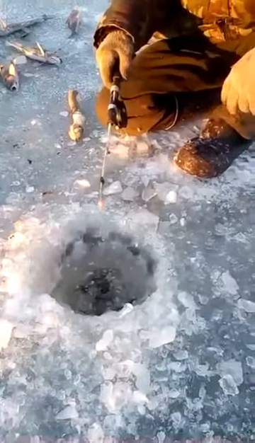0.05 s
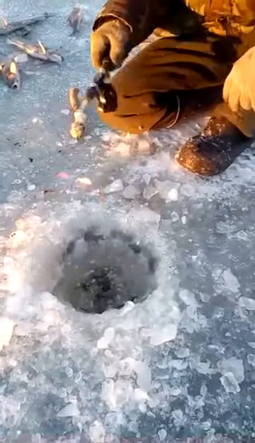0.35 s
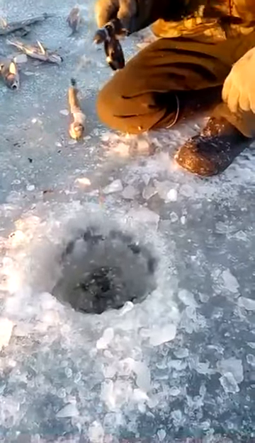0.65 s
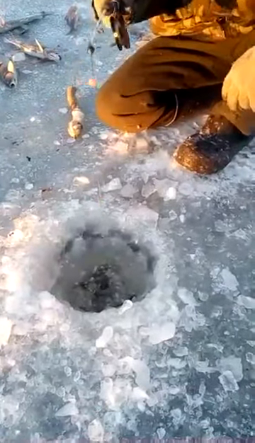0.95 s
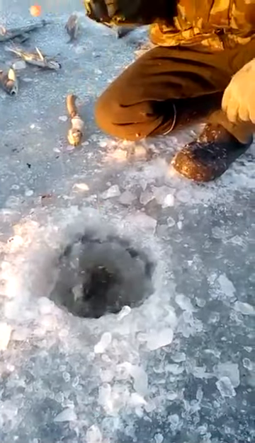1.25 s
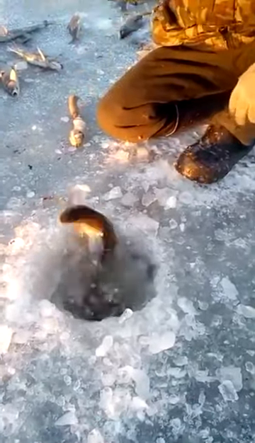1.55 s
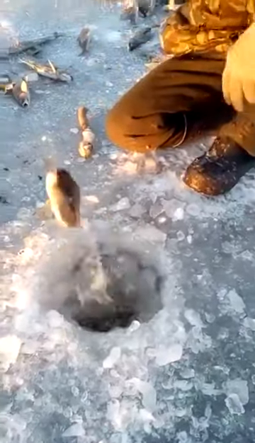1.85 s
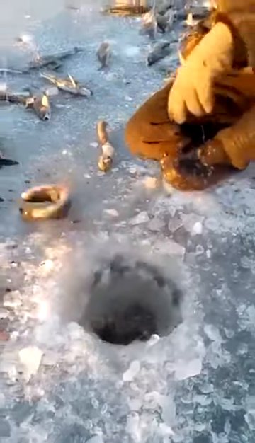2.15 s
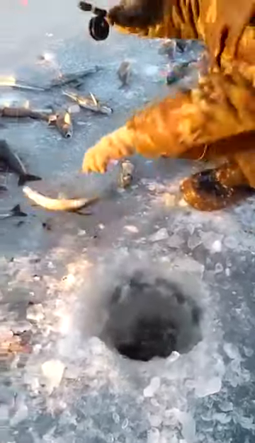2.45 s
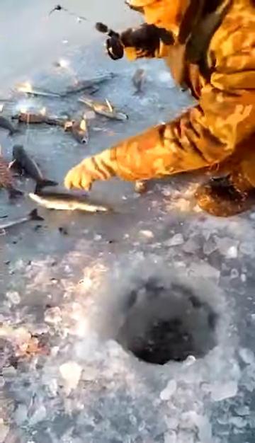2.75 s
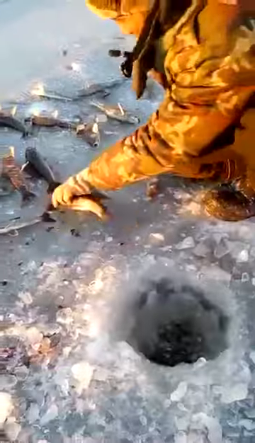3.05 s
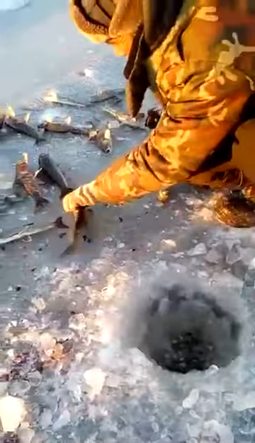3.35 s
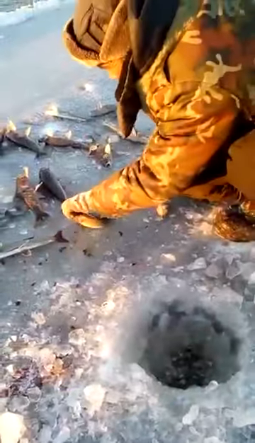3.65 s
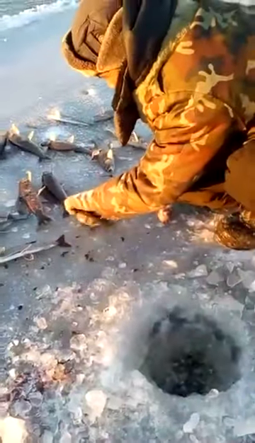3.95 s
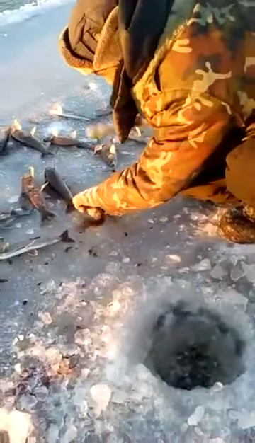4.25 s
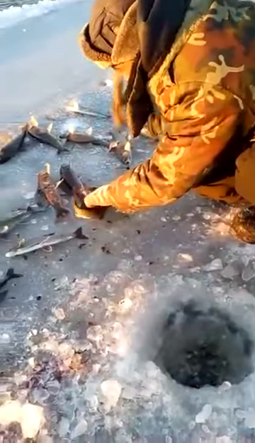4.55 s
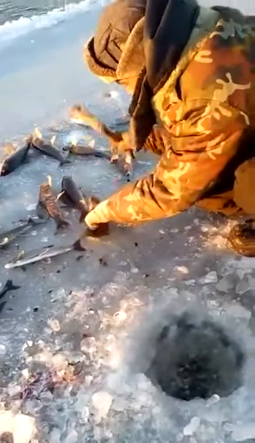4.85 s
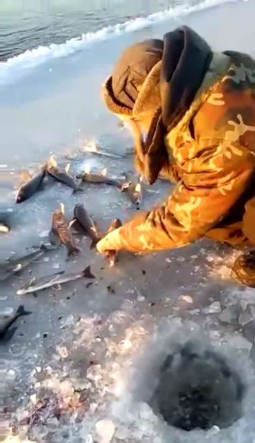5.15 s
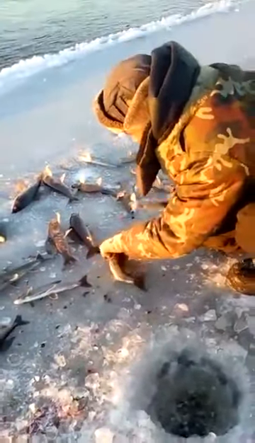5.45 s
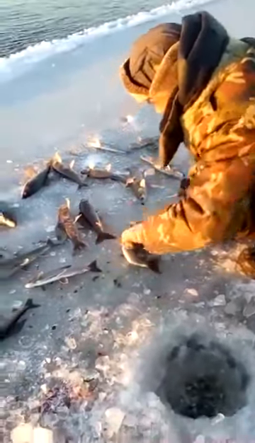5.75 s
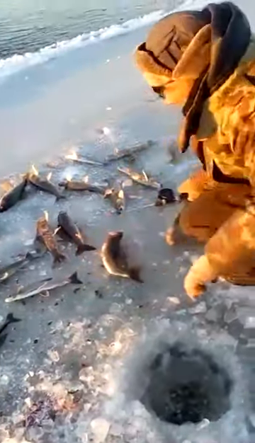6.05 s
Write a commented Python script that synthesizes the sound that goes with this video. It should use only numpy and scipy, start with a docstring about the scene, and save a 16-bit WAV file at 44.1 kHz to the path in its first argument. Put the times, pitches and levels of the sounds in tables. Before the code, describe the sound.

A fishing line hisses and water gurgles as a fish is pulled out, then it flops and slaps on wet ice amid jacket rustles.

```python
"""At a hole in the ice, in the open air, a fish is pulled out and held down on wet slush.
The line hisses by friction and the reel clacks in the modes of its housing. Bubbles, each a small
resonator, fizz and gulp in the hole. The fish skids. The flopping fish, a knee, the rod and a stick
striking the fish each push the air (a thud) and tear a film of water (a wet slap). Wet skin and ice
crumbs snap under a glove, and a stiff winter jacket rustles as the arm moves."""
import sys
import numpy as np
from scipy import signal
from scipy.fft import rfft, irfft
from scipy.io import wavfile

SR = 44100
rng = np.random.default_rng(int(sys.argv[2]) if len(sys.argv) > 2 else 0)


def inscribe(sig):
    """Save sig as 16-bit PCM at rate SR to the path in sys.argv[1].

    A 1-D sig is mono; a 2-D sig holds one channel per row.
    Samples are clipped to [-1, 1] before scaling.
    """
    pcm = np.round(np.clip(np.atleast_2d(sig).T, -1, 1) * 32767)
    wavfile.write(sys.argv[1], SR, pcm.astype(np.int16))


N = 274021
TIME = np.arange(N) / SR
HIT_TIME = np.arange(4096) / SR  # seconds within one short event

# Spectra of the noise sources. Each row: frequency in Hz, relative level in dB.
AIR_SPECTRUM = [(15, -43), (25, -22), (91, -11), (138, -7), (249, -12.5), (298, -5.5), (367, -11),
                (451, -6.5), (665, -11), (1480, -14), (1770, -15.5), (1920, -14.5), (12000, -31),
                (15600, -78), (22000, -120)]
LINE_SPECTRUM = [(88, -65), (150, -8), (337, -7), (449, -9), (567, -22), (620, -19), (729, -2.5),
                 (1960, -14), (2180, -4.5), (2710, -12), (3130, -5.5), (4170, -7), (5270, 1.5),
                 (6500, -3.5), (7300, -12), (11000, -65), (14300, -66), (22000, -120)]
SNAP_SPECTRUM = [(120, -41), (200, -4), (364, -5.5), (774, -3), (1480, -3.5), (2240, 1.5), (3210, 0.5),
                 (3740, 2), (4920, 3), (6600, -4), (8230, -13), (9120, -17), (11000, -23), (12000, -39),
                 (15600, -22), (22000, -120)]
RUNOFF_SPECTRUM = [(88, -30), (150, -9), (700, -1.5), (888, -1), (1630, -10.5), (2480, -3), (2980, -2.5),
                   (3780, -5), (4460, 1), (6920, -6), (12000, -53), (15600, -68), (22000, -120)]
SPLASH_SPECTRUM = [(180, -78), (300, -15), (583, 2.5), (985, -21), (1050, 8), (1240, -56), (1660, -1),
                   (2100, -0.5), (3130, 5.5), (6880, -4), (12000, -39), (15600, -58), (22000, -120)]
SWISH_SPECTRUM = [(1180, -34), (2000, -14), (2870, -6), (4260, -7.5), (4560, -5.5), (6840, 0.5),
                  (7650, -9.5), (9300, -20.5), (10100, -18), (12000, -31), (15600, -103), (22000, -120)]
SKID_SPECTRUM = [(29, -63), (50, -18), (150, 0.5), (299, 3.5), (595, 5.5), (920, -4), (1030, 3),
                 (1870, -4.5), (2100, 1), (3400, -7), (5140, -2), (6610, -8.5), (12000, -49), (15600, -88),
                 (22000, -120)]
GLOVE_SPECTRUM = [(29, -55), (50, -21.5), (198, -5.5), (683, -3.5), (1130, -7), (1830, -9.5), (2100, -6),
                  (2360, -10.5), (2830, -2), (3990, -2), (4910, 3), (6800, -3), (8700, -24.5), (9540, -22),
                  (12000, -65), (15600, -81), (22000, -120)]
REACH_SPECTRUM = [(29, -59), (50, -18), (731, -7), (1390, -10.5), (1790, -7), (2200, -6.5), (3480, -8.5),
                  (5020, 6), (6030, -9), (6920, -4), (7590, -17), (8910, -17.5), (9760, -35), (10700, -36),
                  (12000, -56), (15600, -80), (22000, -120)]
PRESS_SPECTRUM = [(29, -57), (50, -24), (222, -9.5), (519, -3), (899, 1), (1330, -7.5), (1460, -12),
                  (2900, -4.5), (3560, -15), (4580, -1), (5260, -4.5), (6030, -20), (6760, -13),
                  (7940, -30), (12000, -48), (15600, -95), (22000, -120)]
RISE_SPECTRUM = [(29, -76), (50, -23), (160, -3.5), (359, 0), (820, -10), (1080, 1.5), (1390, -9),
                 (1710, -6), (2360, -5.5), (3560, -10), (5020, -5.5), (5890, -11.5), (6760, -9.5),
                 (8130, -28.5), (12000, -50), (15600, -54), (22000, -120)]

# Resonances. Each row: frequency in Hz, bandwidth in Hz, gain in dB.
ROD_MODES = [(2220, 70, 3), (3130, 94, 4)]  # rod and reel as the line runs
ICE_MODES = [(1620, 550, 1), (2960, 180, 4.5), (4900, 970, -0.5), (6350, 360, 3.5)]  # wet ice under a slap
HOUSING_MODES = [(740, 48, 0.5), (950, 28, 2.5), (1550, 110, -3), (1855, 90, 3.5), (2370, 190, 0.5),
                 (2800, 120, 3), (3200, 60, 4.5), (4040, 130, 5.5), (4600, 160, 1), (5200, 66, 8.5),
                 (6200, 80, -6), (7000, 60, -1)]  # the hollow housing of the reel
POCKET_MODES = [(330, 200, -13), (720, 150, 0), (1600, 240, 2), (2700, 350, -1.5)]  # pockets between fish and ice
GRIP_MODES = [(1110, 76, 1), (2040, 100, 4.5), (3000, 130, -2.5), (5300, 170, -0.5)]  # hollows between glove, fish and ice

# Strokes of noise. Each row: start in seconds, length in seconds, body level in dB, hiss level in dB.
LINE_PULLS = [(0.45, 0.23, -85, -78.5), (0.61, 0.1, -80, -71.5), (0.88, 0.42, -79.5, -70.5),
              (0.94, 0.15, -85, -71), (1.2, 0.086, -63.5, -64)]
RUNOFF_FLOW = [(1.32, 0.684, -54.5, -47)]  # water leaving the fish; the levels apply at the end
GLOVE_GRIPS = [(2.62, 0.28, -50.5, -48), (2.91, 0.15, -53.5, -52), (3.07, 0.065, -51, -48),
               (3.2, 0.76, -62, -60), (3.45, 0.061, -62, -53.5), (3.56, 0.089, -68, -51),
               (3.745, 0.029, -78, -53), (3.93, 0.017, -58.5, -49), (4.0, 0.15, -80, -64),
               (4.09, 0.11, -63, -57), (4.175, 0.03, -56, -54.5), (4.25, 0.11, -65, -59.5)]
SLUSH_SKIDS = [(2.018, 0.1, -43.5, -40, 0.0044), (2.178, 0.071, -51, -44.5, .015),
               (2.275, 0.09, -63, -51.5, 0.045), (2.33, 0.077, -48.5, -45.5, 0.021),
               (2.412, 0.17, -42, -46.5, .03), (2.53, 0.043, -46.5, -41.5, .012)]  # fish and knee; each row adds an attack in seconds
ARM_MOVES = [(4.332, 0.12, -55, -54.5, 0.048, "reach"), (4.376, 0.19, -52.5, -49.5, .11, "reach"),
             (4.55, 0.3, -50, -55.5, 0.078, "reach"), (4.728, 0.3, -52, -57.5, 0.11, "press"),
             (4.98, 0.46, -58, -59, 0.063, "press"), (5.362, 0.32, -61.5, -59, 0.14, "press"),
             (5.536, 0.8, -56, -54.5, 0.2, "rise"), (5.76, 0.32, -55.5, -54, 0.23, "rise")]  # each row adds an attack in seconds and the kind of move

# Hard clicks of reel and tackle. Each row: time in seconds, level in dB, pitch in Hz.
TACKLE_CLICKS = [(0.654, -40, 6400), (0.659, -49, 5600), (1.2199, -25.5, 6440), (1.225, -27, 5900),
                 (1.2306, -25.5, 7450), (1.251, -34, 5630), (2.639, -29.5, 6600), (2.7254, -10.5, 5750)]
# Knocks of the reel as the rod is jerked. Each row: start in seconds, level in dB, length in seconds.
REEL_CLACKS = [(0.726, -37, 0.013), (0.752, -35.5, 0.0068), (0.761, -35, 0.0075)]
# Thuds and wet slaps of the flopping fish, a knee, the rod and a stick striking the fish.
# Each row: time in seconds, thud level in dB, pitch in Hz, slap level in dB.
IMPACTS = [(1.237, -44.5, 198, -29), (2.061, -31, 520, -28.5), (2.090, -29, 590, -31.5),
           (2.128, -34.5, 150, -28), (2.15, -33, 130, -52), (2.159, -33.5, 425, -51),
           (2.164, -36.5, 170, -51), (2.223, -30, 1290, -28.5), (2.233, -33, 300, -44),
           (2.245, -28, 470, -31.5), (2.371, -38.5, 600, -45), (2.584, -40, 378, -37),
           (2.802, -32, 750, -39), (2.9193, -20, 1070, -17), (2.955, -29.5, 530, -52),
           (2.977, -36.5, 950, -48), (2.991, -39, 1110, -50), (3.0138, -30.5, 504, -52),
           (3.027, -41.5, 1120, -56), (3.112, -19.5, 740, -19), (3.115, -30, 230, -48),
           (3.119, -26, 264, -25), (3.143, -36.5, 510, -32.5), (3.172, -48, 280, -54),
           (3.209, -41, 800, -50), (4.265, -47, 430, -57), (4.677, -45, 1110, -36.5),
           (4.708, -31, 1150, -58), (4.7272, -25, 390, -23), (4.73, -17.5, 1470, -7.5),
           (4.7686, -26, 865, -33.5), (4.834, -29.5, 1060, -38), (4.910, -23.5, 794, -39),
           (4.96, -43, 850, -50), (4.988, -32, 590, -32.5), (5.172, -47, 900, -58),
           (5.2204, -26.5, 604, -29), (5.327, -36, 950, -49), (5.383, -41.5, 970, -43),
           (5.696, -41, 786, -47), (6.006, -40, 440, -48), (6.026, -43, 190, -52), (6.08, -36.5, 690, -39),
           (6.104, -46.5, 200, -50), (6.153, -35.5, 620, -36)]
# Air pockets closing in the hole. Each row: time of the crest in seconds, level in dB, pitch in Hz,
# swell in seconds, rise in natural log of pitch.
BIG_BUBBLES = [(1.239, -42, 575, 0.0053, .02), (1.507, -42.5, 3750, 0.007, .05),
               (1.532, -36.5, 1770, 0.0098, 0.24), (1.569, -48, 647, 0.015, 0.028),
               (1.578, -53, 1600, 0.017, .01), (1.605, -43, 1760, .007, 0.085),
               (1.65, -38, 1620, 0.012, 0.14), (1.658, -41, 2800, 0.0049, .15),
               (1.662, -42.5, 1330, 0.013, 0.2), (1.689, -38, 2050, 0.0084, 0.297),
               (1.694, -37.5, 2720, 0.013, 0.105), (1.732, -42, 1814, 0.0094, 0.18),
               (1.746, -52, 1940, 0.01, 0.055), (1.809, -41, 834, 0.014, 0.17),
               (1.813, -47, 1845, 0.014, 0.102), (1.869, -33.5, 950, 0.0061, 0.174),
               (1.882, -42, 1120, 0.012, 0.097), (1.913, -35.5, 1092, 0.0085, 0.25),
               (1.921, -31.5, 1293, 0.018, 0.079), (1.955, -51, 603, 0.04, 0.23),
               (1.976, -38, 1015, 0.0095, 0.14)]
# Spells of pattering drops or breaking crumbs. Each row: start and end in seconds, level in dB.
CRUMB_SPELLS = [(1.36, 1.62, -41), (1.617, 2.0, -39), (3.147, 4.4, -47), (5.724, 6.2, -43)]
# Crunches of slush and spatter. Each row: start in seconds, level in dB, length in ms, pitch in Hz.
WET_CRUNCHES = [(1.377, -38, 3, 3500), (1.391, -38, 2, 4200), (1.432, -36.5, 1.6, 3000),
                (1.519, -36, 2.7, 2800), (1.567, -36, 3, 4800), (1.5945, -29.5, 5.1, 5430),
                (1.603, -28.5, 5.6, 5070), (1.65, -33, 11.5, 3680), (1.686, -34, 7.4, 4450),
                (1.695, -28, 3.2, 5130), (1.806, -31, 7, 4870), (1.851, -32, 3.5, 4400),
                (1.867, -35, 2, 3430), (1.9168, -19, 4.2, 4780), (1.94, -25, 8.5, 5800),
                (1.951, -26, 7.5, 5200), (2.0055, -30.5, 5.3, 4900), (2.025, -33, 7.1, 2500),
                (2.038, -24.5, 12, 4600), (2.102, -25.5, 5.8, 6200), (2.208, -27, 3.7, 4400),
                (2.372, -28.5, 9, 6500), (2.389, -25, 7.9, 3050), (2.4279, -24, 13, 5140),
                (2.54, -29, 7, 4300), (2.556, -25, 5.1, 4030), (2.582, -40, 4.4, 4600),
                (2.689, -29, 8.4, 4660), (2.703, -35, 7.8, 1660), (2.761, -33, 3.9, 6300),
                (3.004, -37, 7.6, 1984), (3.174, -33, 1.5, 4140), (3.205, -34, 6, 2700),
                (3.212, -29.5, 3.3, 4030), (3.294, -44, 2.5, 2900), (3.3022, -31.5, 2, 3820),
                (3.458, -42, 4.1, 5000), (3.469, -43, 4.3, 6260), (3.52, -37.5, 5.2, 5130),
                (3.526, -39, 5.4, 6100), (3.568, -40.5, 7.2, 5160), (3.584, -40, 3.7, 2100),
                (3.598, -33, 5.4, 6200), (3.612, -29.5, 30, 6350), (3.641, -20.5, 7.1, 4900),
                (3.7348, -23.5, 6.4, 4950), (3.77, -39.5, 8.3, 5200), (3.818, -34, 4.9, 5200),
                (3.826, -34, 9.8, 5100), (3.855, -37.5, 4.3, 3360), (3.926, -31, 9.1, 4400),
                (3.941, -29, 5.7, 4900), (4.245, -39, 3.4, 5340), (4.3742, -36.5, 2.4, 2600),
                (4.381, -40, 3, 3200), (4.637, -30.5, 5.5, 5400), (4.984, -33.5, 12, 6800),
                (5.66, -46, 4, 6000), (5.6954, -27, 3.5, 5300), (6.016, -32, 2, 6530),
                (6.0675, -29.5, 1.9, 6330), (6.163, -29.5, 3, 2380), (6.185, -35, 9.1, 4860)]

# Smooth swells of noise. Each row: middle in seconds, level in dB, width in seconds.
SURFACE_SPLASHES = [(1.40, -51, 0.05), (1.655, -47.5, 0.045), (1.815, -54, 0.021), (1.88, -48, 0.12)]  # a sheet of water breaks
SKIN_SWISHES = [(1.41, -51.5, 0.035), (2.103, -46, 0.17), (3.527, -57, 0.023), (4.12, -57, 0.052),
                (5.077, -40.5, 0.063), (5.105, -42.5, 0.013), (5.68, -48.5, 0.012)]  # slippery skin and spray slide over ice
HOLE_SLOSHES = [(1.42, -65, .05), (1.575, -61, .025), (1.655, -50, 0.036), (1.735, -60, .03),
                (1.89, -57, 0.074)]  # water churns as the fish breaks through

# Snapping chips of ice. Each row: start in seconds, peak level in dB, pitch in Hz.
CHIP_PINGS = [(2.006, -32, 4950), (3.737, -32.5, 4960), (6.1876, -34.5, 4940)]
# Spells of sliding over lumps of slush. Each row: start and end in seconds, level in dB, pitch in Hz.
BUMP_SPELLS = [(2.051, 2.22, -39, 505), (2.36, 2.6, -39.5, 500), (2.678, 2.9, -40.5, 1100),
               (5.427, 5.58, -47.5, 895)]


def from_db(db):
    """Decibels are logarithmic: 20 dB is a ratio of ten, here of amplitude, pitch or length."""
    return 10 ** (np.asarray(db) / 20)


def rms_one(x):
    """Normalisation to unit mean power."""
    return x / np.sqrt(np.mean(x ** 2) + 1e-20)


def cut(x, hz, kind, order=2):
    """A Butterworth low- or high-pass falls 6 dB per octave for each order."""
    return signal.sosfilt(signal.butter(order, np.clip(hz, 10, .45 * SR), kind, fs=SR, output="sos"), x)


def resonate(x, hz, width_hz):
    """A damped resonator responds with unit gain at its centre."""
    r = np.exp(-np.pi * width_hz / SR)
    feedback = [1, -2 * r * np.cos(2 * np.pi * hz / SR), r * r]
    return signal.lfilter(np.array([1, 0, -1]) * (1 - r * r) / 2, feedback, x)


def glide(x, hz, width_hz):
    """A time-varying resonator: its centre follows the curve hz."""
    turn = np.exp(2j * np.pi * np.cumsum(hz) / SR)
    r = np.exp(-np.pi * width_hz / SR)
    return 2 * np.real(turn * signal.lfilter([1 - r], [1, -r], x / turn))


def colour(x, spectrum, size=4096):
    """A minimum-phase filter imposes a spectrum causally."""
    hz, db = np.transpose(spectrum)
    bins_hz = np.arange(size // 2 + 1) * SR / size
    gain = from_db(np.interp(np.log(bins_hz + 1), np.log(hz), db))
    cepstrum = irfft(np.log(gain))
    cepstrum[1:size // 2] *= 2
    cepstrum[size // 2 + 1:] = 0
    return signal.fftconvolve(x, irfft(np.exp(rfft(cepstrum))))[:len(x)]


def drift(per_s):
    """Random modulation: straight lines join Gaussian values of unit spread."""
    knots = np.arange(0, N / SR + 1, 1 / per_s)
    return np.interp(TIME, knots, rng.standard_normal(4096)[:len(knots)])


def grains(per_s, spread_db):
    """Shot noise: independent impulses of uneven size, at unit power."""
    sizes = from_db(spread_db * np.minimum(rng.exponential(1, N), 4)) * rng.choice([-1, 1], N)
    return rms_one(sizes * (rng.random(N) < per_s / SR))


def add(out, s, sound):
    """Superposition: a sound joins the mix at s seconds."""
    start = max(round(s * SR), 0)
    out[start:start + len(sound)] += sound[:max(N - start, 0)]


def at_level(sound, db, length_s):
    """Energy is power times duration: scale a transient to the energy of db held for length_s."""
    return from_db(db) * sound / np.sqrt(np.sum(sound ** 2) / (length_s * SR) + 1e-20)


def strokes(rows, attack_s, release_s):
    """Incoherent strokes add in power; each rises, holds and decays. Gives body and hiss gains."""
    power = 0
    for start, length, body_db, hiss_db in rows:
        age = TIME - start
        shape = np.clip(age / attack_s, 0, 1) * np.exp(-np.clip((age - length) / release_s, 0, 20))
        power = power + (from_db([[body_db], [hiss_db]]) * shape) ** 2
    return np.sqrt(power)


def swells(rows):
    """Gaussian envelopes add up to one smooth gain."""
    return sum(from_db(db) * np.exp(-2 * ((TIME - s) / width) ** 2) for s, db, width in rows)


def shaped_noise(excitation, spectrum, gains, split_hz=2500):
    """Source and filter: coloured noise splits into a low body and a high hiss, each with its gain."""
    sound = colour(excitation, spectrum)
    body, hiss = (rms_one(cut(sound, split_hz, kind, order=3)) for kind in ("low", "high"))
    return body * gains[0] + hiss * gains[1]


def open_air(level_db=-73):
    """Ambient noise: a faint, steady broadband floor with sparse ticks."""
    noise = rng.standard_normal(N) + 0.037 * grains(60, 6.4)
    return from_db(level_db) * rms_one(colour(noise, AIR_SPECTRUM))


def line(fastest_s=0.95, run_s=0.11, zing_db=-67.5, zing_width_hz=710):
    """Friction of wet line in the rings drives the rod's modes; speed adds a wavering, rising swish."""
    rub = (rng.standard_normal(N) + 0.5 * grains(380, 2.6)) * from_db(1.3 * drift(24.9))
    ringing = sum(from_db(db) * resonate(rub, hz, width) for hz, width, db in ROD_MODES)
    speed = np.exp(-((TIME - fastest_s) / run_s) ** 2)
    zing_hz = 5300 + 150 * speed + 70 * drift(18.3)
    zing = rms_one(glide(glide(rub, zing_hz, zing_width_hz), zing_hz, 3 * zing_width_hz))
    pulls = strokes(LINE_PULLS, attack_s=0.074, release_s=0.038)
    hiss = shaped_noise(rub + ringing, LINE_SPECTRUM, pulls)
    return from_db(zing_db) * speed * zing + from_db(0.5) * hiss


def ice_reflection(x, delay_s=0.000957, sway_s=0.00003, echo_db=-25):
    """Interference with the reflection off the ice makes a comb that shifts as the source moves."""
    delay = delay_s + sway_s * drift(5.2)
    gain = from_db(echo_db)
    return (x + gain * np.interp(TIME - delay, TIME, x)) / np.sqrt(1 + gain ** 2)


def snaps(crest_db=10.5, spatter_db=-27, gap_db=6):
    """Impulse excitation: in each click, slap or crunch, tiny snaps ring a narrow gap and the ice."""
    out = np.zeros(N)
    swarm = grains(5500, 2.5)
    for s, db, length, hz, ice_db in clicks() + slaps() + crunches():
        progress = HIT_TIME / length
        contact = np.minimum(.4 + 1.5 * progress, 1) * np.exp(-np.maximum(progress - .75, 0) / .42)
        spatter = from_db(spatter_db) * np.exp(-HIT_TIME / .025)
        impulses = np.roll(swarm, rng.integers(N))[:len(HIT_TIME)] * (contact + spatter)
        ice = sum(from_db(mode_db) * resonate(impulses, mode_hz * from_db(rng.normal(0, 0.51)), width)
                  for mode_hz, width, mode_db in ICE_MODES)
        gap = from_db(gap_db) * resonate(impulses, hz, width_hz=500)
        leak = 0.01 * cut(impulses, 0.51 * hz, "high")
        sound = colour(gap + leak + from_db(ice_db) * (.5 * impulses + ice), SNAP_SPECTRUM)
        add(out, s, at_level(sound, db - crest_db, length))
    return out


def clicks(length_s=0.002, ice_db=-25.5):
    """Hard contacts are brief: the tackle clicks with little ring. Gives rows for snaps()."""
    return [(s, db, length_s, hz, ice_db) for s, db, hz in TACKLE_CLICKS]


def reel(crest_db=9, rattle_db=-11, settle_db=-17, settle_s=0.056):
    """Modal ringing: loose parts chatter against the reel's hollow housing and settle with a rustle."""
    out = np.zeros(N)
    chatter = grains(4000, 1.2)
    for s, db, length in REEL_CLACKS:
        envelope = np.exp(-(HIT_TIME / length) ** 2) + from_db(settle_db) * np.exp(-HIT_TIME / settle_s)
        taps = np.roll(chatter, rng.integers(N))[:len(HIT_TIME)] * envelope
        housing = sum((-1) ** k * from_db(mode_db) * resonate(taps, hz, width)
                      for k, (hz, width, mode_db) in enumerate(HOUSING_MODES))
        rattle = from_db(rattle_db) * cut(taps, 1300, "high")
        sound = cut(housing + rattle, 6800, "low", order=6)
        add(out, s, at_level(sound, db - crest_db, length))
    return out


def slaps(hz=3750, ice_db=11, lead_share=0.36):
    """A water film tears just ahead of each thud, longer in a harder slap. Gives rows for snaps()."""
    rows = []
    for s, _, _, db in IMPACTS:
        length = 0.00459 * from_db(0.3 * (db + 14.5))  # doubles for every 20 dB
        rows.append((s - lead_share * length, db, length, hz, ice_db))
    return rows


def thuds(lead_s=0.003, rock_hz=205, hollow_hz=990, ring_cycles=2.8):
    """Displaced air radiates one push and pull per impact; a patter follows over the next few ms."""
    out = np.zeros(N)
    age = np.maximum(HIT_TIME - lead_s, 0)
    landing = (age > 0) * (from_db(-9) * np.exp(-age / 0.0049) + from_db(-30) * np.exp(-age / 0.02))
    for s, db, hz, *_ in IMPACTS + bumps():
        phase = 2 * np.pi * hz * (HIT_TIME - lead_s)
        push = -phase * np.exp((1 - phase ** 2) / 2)
        noise = rms_one(resonate(rng.standard_normal(len(age)), hz, 1.48 * hz))
        patter = cut(landing * noise, 5.46 * hz, "low", order=3)
        # the mass rocks once or twice after the impact
        mass_hz = rock_hz * from_db(rng.normal(0, 1.6))
        rocking = from_db(-16) * np.sin(2 * np.pi * mass_hz * age) * np.exp(-age / 0.0074)
        # a flat, high-pitched impact cups more air; that air rings and cushions the contact
        hollow = from_db(-0.5 + 42 * np.clip(np.log2(hz / hollow_hz), -.7, 0))
        cupped = hollow * ring_cycles * resonate(push, hz, hz / (np.pi * ring_cycles))
        cushioned = (from_db(-0.5) * push - rocking) / (1 + 0.35 * hollow)
        add(out, s - lead_s, from_db(db) * (cushioned + patter + cupped))
    return cut(out, 91, "high")


def gulps(ring_db=-15, ring_s=0.02, slosh_db=-8, overtone_db=-19, waver=0.044):
    """Bubble resonance: a ragged bubble swells, rises in pitch near the surface and rings on briefly."""
    out = np.zeros(N)
    for s, db, hz, swell_s, rise in BIG_BUBBLES + gurgles():
        age = HIT_TIME / swell_s - 1  # zero at the crest
        shake, churn = rng.standard_normal((2, len(age)))
        wobble = rms_one(cut(shake, 220, "low"))
        pitch = hz * np.exp(rise * np.tanh(2 * age) * np.where(age < 0, 1, .5) + waver * wobble)
        phase = 2 * np.pi * np.cumsum(pitch) / SR
        tail = from_db(ring_db) * np.clip(4 * age, 0, 1) * np.exp(-np.abs(age) * swell_s / ring_s)
        envelope = np.exp(-6 * age ** 2) + tail
        tone = (np.sin(phase) + from_db(overtone_db) * np.sin(2 * phase)) * from_db(1.2 * wobble)
        water = rms_one(cut(resonate(churn, 1.03 * hz, 0.21 * hz), 2.5 * hz, "low", order=3))
        add(out, s - swell_s, from_db(db) * envelope * (tone + from_db(slosh_db) * water))
    return out


def droplets(per_s, q=22):
    """Tiny bubbles resonate at pitches set by their size; per_s of each size, with quality factor q."""
    pitches = np.geomspace(550, 9000, num=26)
    impulses = grains(per_s * len(pitches), 3.6)
    size = rng.integers(len(pitches), size=N)
    return rms_one(sum(rms_one(resonate(impulses * (size == k) + 1e-18, hz, hz / q)) * np.sqrt(hz)
                       for k, hz in enumerate(pitches)))


def runoff(body_db_per_s=24, hiss_db_per_s=13):
    """Flow noise grows as water streams ever faster off the fish, in spurts of droplets and spray."""
    fizz = .7 * droplets(330, q=10) * from_db(2.5 * drift(60))
    mist = .8 * grains(7000, 2.5) * from_db(3.2 * drift(110))
    start, length = RUNOFF_FLOW[0][:2]
    remaining_s = np.maximum(start + length - TIME, 0)
    growth = from_db(-remaining_s * [[body_db_per_s], [hiss_db_per_s]])
    flow = strokes(RUNOFF_FLOW, attack_s=0.025, release_s=0.03) * growth
    return from_db(-1) * shaped_noise(fizz + mist, RUNOFF_SPECTRUM, flow)


def crunches(ice_db=-2.5, crumb_hz=4500, crumb_s=0.001, gap_s=0.035, spread_db=3):
    """Fracture and impact: slush crunches, crumbs break and drops land. Gives rows for snaps()."""
    rows = [(s, db, ms / 1000, hz, ice_db) for s, db, ms, hz in WET_CRUNCHES]
    pitches = crumb_hz * from_db(0.5 * np.clip(rng.standard_normal(512), -2, 2))
    slots = [(s, db) for start, end, db in CRUMB_SPELLS for s in np.arange(start, end, gap_s)]
    delays, sizes = rng.random(256), rng.standard_normal(256)
    return rows + [(s + gap_s * delay, db + spread_db * size, crumb_s, hz, ice_db)
                   for (s, db), delay, size, hz in zip(slots, delays, sizes, pitches)]


def spray(rows, spectrum):
    """Dense impacts of very fine drops merge into short swells of noise."""
    return swells(rows) * rms_one(colour(grains(12000, 1.6) + .5 * droplets(80), spectrum))


def slosh(shift_db=2):
    """Cavity resonance: churning water rings pockets whose pitch shifts with their size."""
    churn = grains(2500, 2.0) * from_db(2.5 * drift(80))
    ringing = sum(from_db(db) * glide(churn, hz * from_db(shift_db * drift(45)), width)
                  for hz, width, db in POCKET_MODES)
    return swells(HOLE_SLOSHES) * rms_one(cut(cut(ringing, 170, "high"), 4000, "low"))


def gurgles(start_s=1.5, end_s=1.97, per_s=46, level_db=-53.5, centre_hz=1788, cycles=14, rise=0.14):
    """Small bubbles of random size resonate between the big ones. Gives rows for gulps()."""
    moments = np.arange(start_s, end_s, 1 / per_s)
    delays = rng.random(128) / per_s
    highs, louds = rng.standard_normal((128, 2)).T
    pitches = centre_hz * from_db(3.5 * np.clip(highs, -2, 2))
    return [(s + delay, level_db + 2.5 * loud, hz, cycles / hz, rise)
            for s, delay, loud, hz in zip(moments, delays, louds, pitches)]


def pings(decay_s=0.0037):
    """Free vibration: a snapped chip of ice rings as one damped sine."""
    out = np.zeros(N)
    for s, db, hz in CHIP_PINGS:
        add(out, s, from_db(db) * np.sin(2 * np.pi * hz * HIT_TIME) * np.exp(-HIT_TIME / decay_s))
    return out


def skid():
    """Granular friction: wet crystals give way in clumps under the sliding fish and shifting knee."""
    crystals = (grains(3500, 1.6) + 0.38 * droplets(150)) * from_db(1.4 * drift(90))
    power = sum(strokes([row], attack_s, release_s=0.039) ** 2 for *row, attack_s in SLUSH_SKIDS)
    return from_db(-1) * shaped_noise(crystals, SKID_SPECTRUM, np.sqrt(power))


def bumps(gap_s=0.024):
    """Surface roughness turns sliding into soft, irregular knocks. Gives rows for thuds()."""
    slots = [(s, db, hz) for start, end, db, hz in BUMP_SPELLS for s in np.arange(start, end, gap_s)]
    delays = rng.random(256)
    scatter = np.clip(rng.standard_normal((256, 2)), -2, 2)
    return [(s + gap_s * delay, db + 1.5 * hard, hz * from_db(2 * high))
            for (s, db, hz), delay, (hard, high) in zip(slots, delays, scatter)]


def glove(shift_db=0.94):
    """Stick and slip of a wet glove rings hollows that shift with the grip; crushed ice tinkles."""
    rub = grains(3000, 0.98) + 0.69 * grains(220, 2.4)
    hollows = sum(from_db(db) * glide(rub, hz * from_db(shift_db * drift(16)), width)
                  for hz, width, db in GRIP_MODES)
    tinkle = 0.31 * droplets(25, q=25)
    scrape = (rub + hollows + tinkle) * from_db(1.34 * drift(34.49))
    grips = strokes(GLOVE_GRIPS, attack_s=0.017, release_s=0.066)
    return from_db(-3) * shaped_noise(scrape, GLOVE_SPECTRUM, grips)


def jacket(catch_share=0.48, fold_db=-5, fold_hz=2600):
    """Friction of stiff cloth: the weave catches unevenly, and a fold resonates as it bends."""
    rub = (rng.standard_normal(N) + catch_share * grains(600, 2.4)) * from_db(0.91 * drift(60))
    fold = from_db(fold_db) * glide(rub, fold_hz * from_db(2 * drift(7)), width_hz=450)
    spectra = {"reach": REACH_SPECTRUM, "press": PRESS_SPECTRUM, "rise": RISE_SPECTRUM}
    out = np.zeros(N)
    for *move, attack_s, kind in ARM_MOVES:
        cloth = np.roll(rub + fold, rng.integers(N))
        out += shaped_noise(cloth, spectra[kind], strokes([move], attack_s, release_s=0.052))
    return from_db(-0.86) * out


def scene():
    """Close sources superpose without reverberation; line, glove and jacket reflect once off the ice."""
    air = open_air()
    hole = reel() + runoff() + slosh() + gulps() + spray(SURFACE_SPLASHES, SPLASH_SPECTRUM)
    contacts = thuds() + snaps() + pings() + skid() + spray(SKIN_SWISHES, SWISH_SPECTRUM)
    angler = ice_reflection(line() + glove() + jacket())
    return (hole + contacts + angler + air)[None]


def record(dry, cutoff_hz=12000):
    """Band limiting: a steep elliptic low-pass removes the highest treble."""
    return signal.sosfilt(signal.ellip(10, .2, 90, cutoff_hz, fs=SR, output="sos"), dry)


dry = scene()
out = record(dry)
inscribe(out)
```